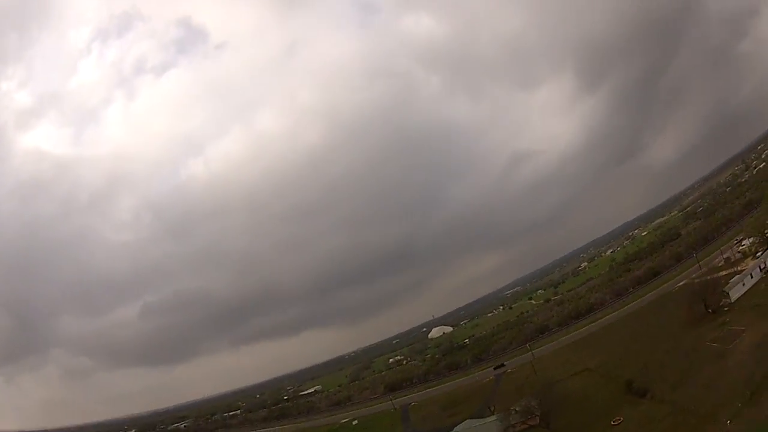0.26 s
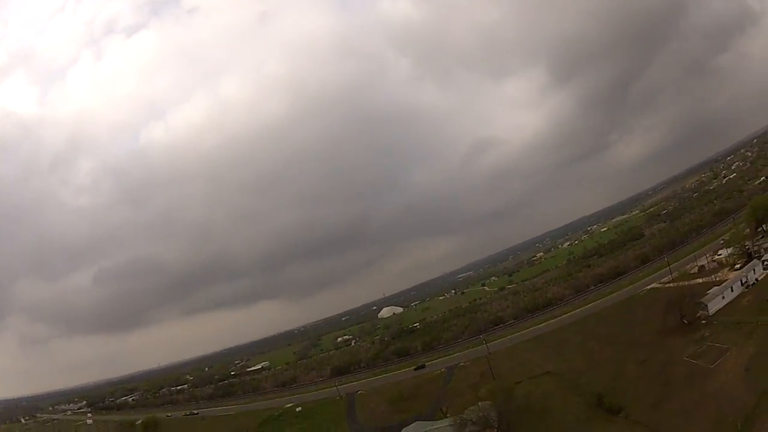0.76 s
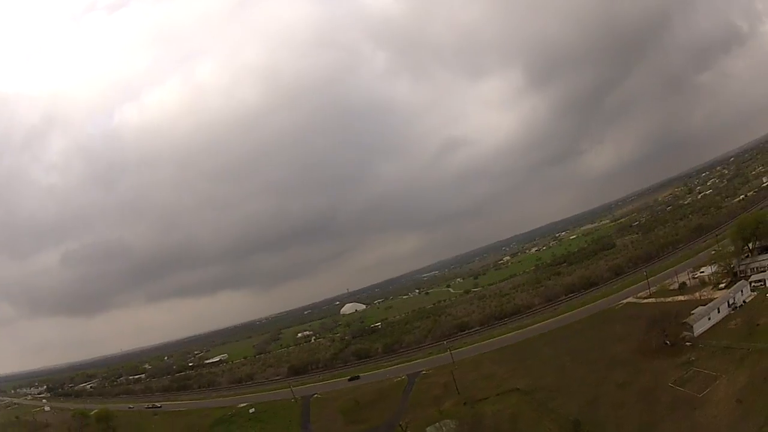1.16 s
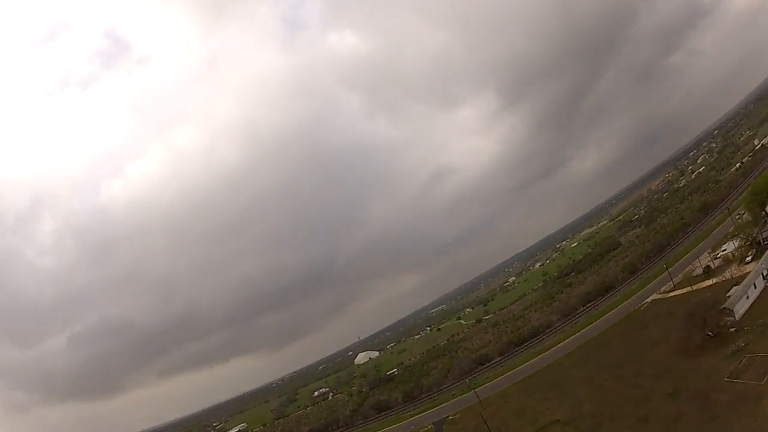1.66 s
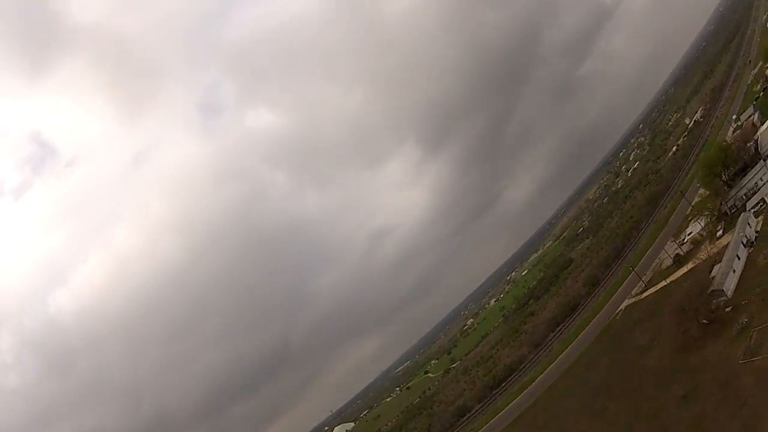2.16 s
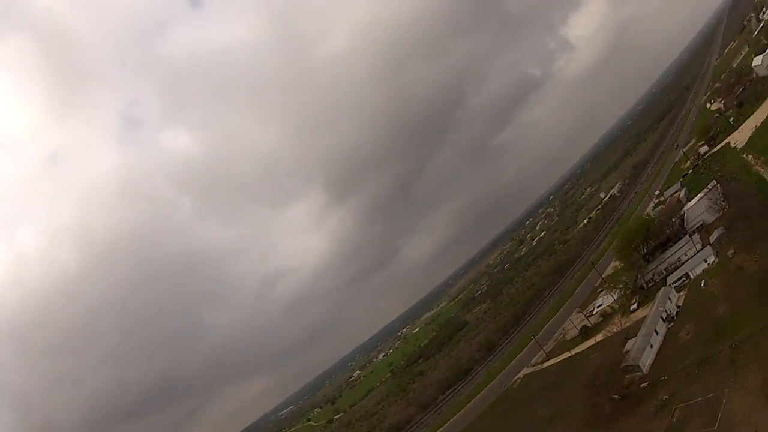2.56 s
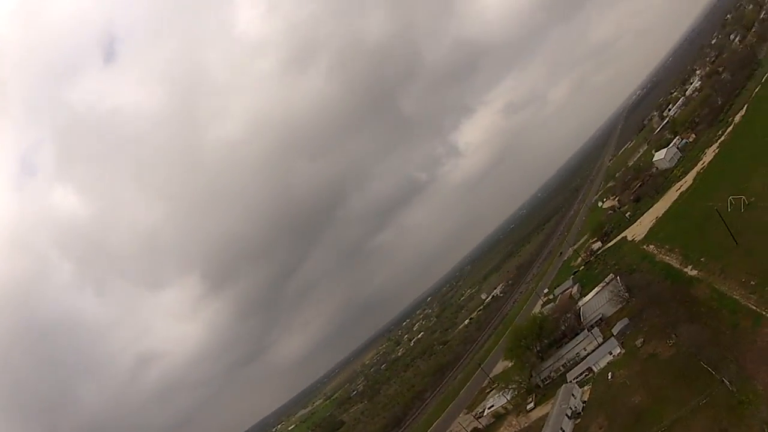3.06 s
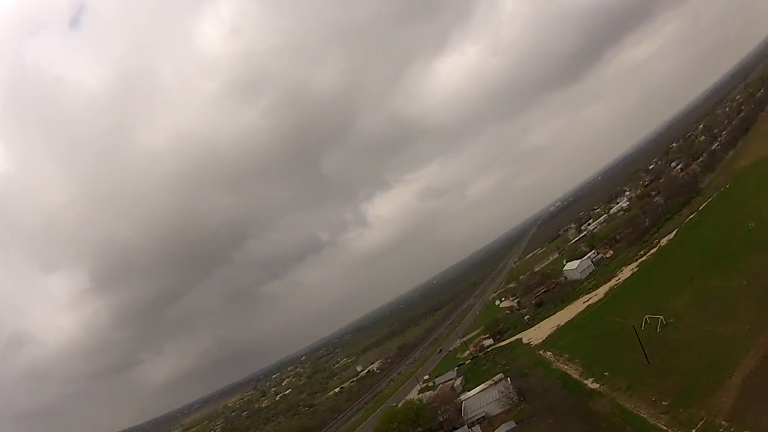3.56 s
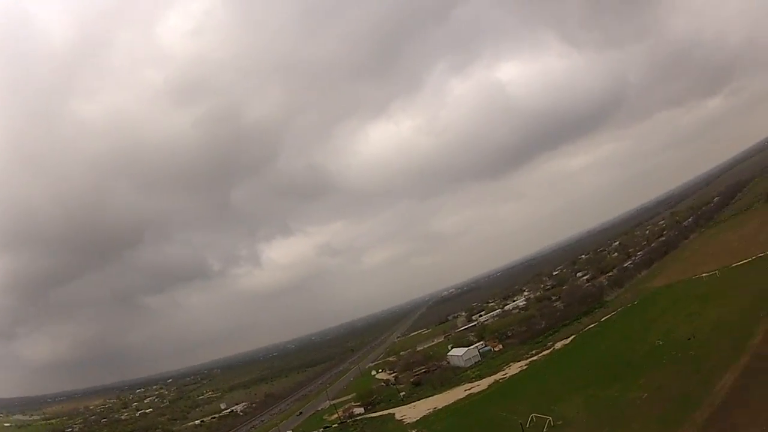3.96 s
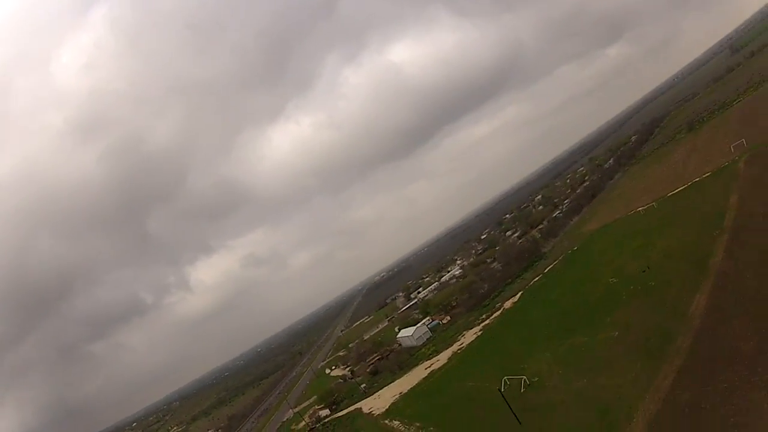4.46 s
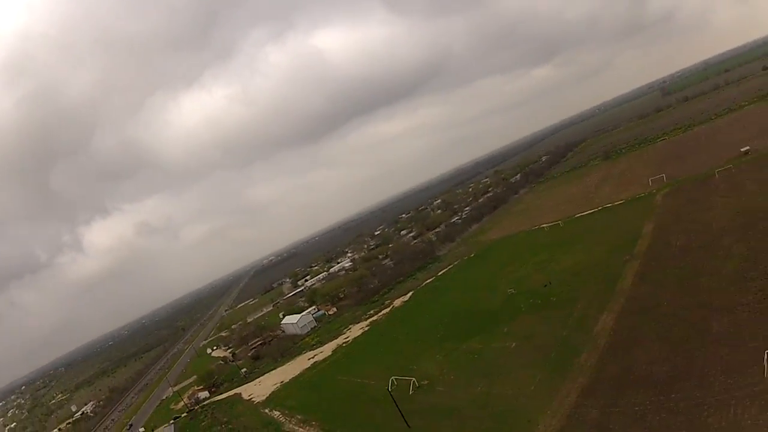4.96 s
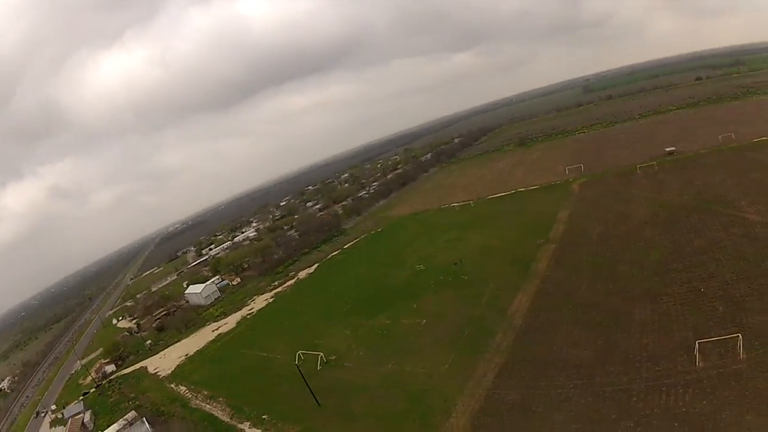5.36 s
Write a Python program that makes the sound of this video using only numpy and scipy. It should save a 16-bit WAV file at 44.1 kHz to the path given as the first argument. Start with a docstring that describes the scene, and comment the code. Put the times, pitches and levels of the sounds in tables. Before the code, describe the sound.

A small propeller buzzes steadily at full throttle, winds down quickly, then rushing wind buffets the airborne microphone and gradually weakens.

```python
"""Electric model aeroplane, on-board microphone

A two-bladed propeller buzzes at full throttle, rasping once a turn, then winds down: harmonics and noise locked to the shaft.
As its slipstream dies, wind (coloured, flickering noise) buffets the airframe, easing as speed is lost, firmer at the end.
A slow converter holds each sample, mirroring the sound into a thin treble fizz."""
import sys
import numpy as np
from scipy import signal
from scipy.fft import rfft, irfft
from scipy.io import wavfile
from scipy.ndimage import uniform_filter1d, minimum_filter1d

SR = 44100
rng = np.random.default_rng(int(sys.argv[2]) if len(sys.argv) > 2 else 0)


def int16_out(signal):
    """Quantize to a 16-bit WAV file."""
    q = np.round(np.clip(np.atleast_2d(signal).T, -1, 1) * 32767)
    wavfile.write(sys.argv[1], SR, q.astype(np.int16))


N = 247401
TIME_S = np.arange(N) / SR
BINS_HZ = np.fft.rfftfreq(N, 1 / SR)

# airframe response to blade pulses: f/Hz, level/dB
AIRFRAME_RESPONSE = [(30, -31), (160, 0.5), (220, 7.5), (330, 0.4), (500, 2.3), (660, 0.4), (790, -8),
                     (980, -20.5), (1640, -20), (1960, -16), (2600, -18.5), (3300, -22.5), (5500, -43.5)]
# rasp spectrum: f/Hz, relative density/dB
RASP_SPECTRUM = [(600, -26), (1000, -11), (1550, -26), (1950, -6), (2500, -3.5), (3350, 3), (3800, 0),
                 (4450, -5.5), (4950, 0), (5400, -11), (5900, -21.5)]
# wind spectra, low to high: f/Hz, relative density/dB
BUFFET_SPECTRUM = [(8, -5), (20, -16), (45, -4), (85, -1), (125, -2), (170, -5.5), (260, -32), (1500, -100)]
ROAR_SPECTRUM = [(70, -12), (115, -9.5), (160, -1), (245, -1), (330, -5), (390, -8.5), (470, -16),
                 (700, -69), (3000, -100)]
RUSH_SPECTRUM = [(250, -11), (350, -5.5), (420, -2), (500, -1.5), (640, -2.6), (740, -8), (860, -16.5),
                 (1000, -22.5), (1200, -22.5), (1500, -42), (5000, -100)]
HISS_SPECTRUM = [(600, -24), (1100, -5), (1450, -1.2), (2300, 0), (3050, 0.5), (3500, -7), (4100, -8),
                 (4700, -11.5), (5300, -11.5), (5900, -16.5)]
# narrow peaks in the hiss: f/Hz, width/Hz, added power re hiss/dB
HISS_PEAKS = [(1180, 59, 1.5), (2764, 94, 5), (3900, 120, -1), (4310, 89, 0)]
# brief swells and dips of the wind noise: t/s, buffet change/dB, roar change/dB, half length/s
WIND_SWELLS = [(1.36, 9, 3, 0.031), (1.532, 3, -1, 0.14), (1.953, -5, 1, 0.16), (2.25, -1.5, 0.5, 0.1),
               (2.88, 4.5, 0.5, 0.19), (3.17, 4, 1.5, 0.07), (3.564, 7.5, 3.5, 0.048),
               (3.863, 14, -3, 0.011), (4.618, 8, 2, 0.035), (5.224, 15, 6.5, 0.0088), (5.34, 1, 1.5, 0.2)]
# airflow strength: t/s, level/dB
AIRFLOW = [(0, 1), (1.65, 0.5), (2.1, -0.5), (2.6, -3.5), (3.0, -4), (3.3, -7), (3.6, -7), (4.2, -9.5),
           (4.8, -13.5), (5.1, -13), (5.6, -11)]
# wind level laws: level at 0 dB airflow/dB, slope/(dB per dB airflow), change in full slipstream/dB
BUFFET_LEVEL = (-17, 0.42, -11.5)
ROAR_LEVEL = (-9.5, 0.98, -17.5)
RUSH_LEVEL = (-16.5, 1.116, -9.5)
HISS_LEVEL = (-31, 1.0, -0.5)

FULL_BLADE_HZ = 327.0  # blade passes per second, two per turn
THROTTLE_BACK_S, SLOWING_HZ_PER_S, EASE_S = 0.864, 400, 0.018
# powered levels at full speed; exponents act on speed share
TONE_DB, TONE_EXPONENT = -16.25, 0.97
RASP_DB, RASP_EXPONENT = -22.5, 1.8
# drive cut: rasp stops, freewheeling blades are quieter
POWER_OFF_S, RELEASE_S, FREEWHEEL_DB = 1.235, 0.055, -4.5
CONVERTER_HZ, EDGE_HZ = 12000, 15290


def gain_of(db):
    """Decibels to amplitude gain."""
    return 10 ** (np.asarray(db) / 20)


def evened(x):
    """Scale to unit rms."""
    return x / np.sqrt(np.mean(x ** 2) + 1e-20)


def spectrum_db(points, hz):
    """Interpolate a dB curve on a log-frequency axis."""
    f_hz, level_db = np.transpose(points)
    return np.interp(np.log(hz + 1), np.log(f_hz + 1), level_db)


def noise(bin_gains):
    """White noise shaped by bin gains, unit rms."""
    spectrum = rfft(rng.standard_normal(N))
    return evened(irfft(spectrum * bin_gains, N))


def wander(rate_hz):
    """Slow random drift, low-passed at rate_hz, unit rms."""
    return noise(1 / (1 + (BINS_HZ / rate_hz) ** 4))


def ring(x, points, size=4096):
    """Filter through a causal minimum-phase body with the given response."""
    hz = abs(np.fft.fftfreq(size, 1 / SR))
    log_gain = np.log(gain_of(spectrum_db(points, hz)))
    # the Hilbert transform of log gain supplies the phase
    response = np.fft.ifft(np.exp(np.conj(signal.hilbert(log_gain)))).real
    return signal.oaconvolve(x, response[:size // 2])[:N]


def propeller_speed():
    """Share of full speed: steady, a rounded corner, then an even slowing to near rest."""
    slowing_s = EASE_S * np.logaddexp(0, (TIME_S - THROTTLE_BACK_S) / EASE_S)
    return np.maximum(1 - SLOWING_HZ_PER_S * slowing_s / FULL_BLADE_HZ, 1e-4)


def blades(turns, slowed, uneven_db=-15.5, blunt_db=-25, flutter_db=0.5, count=34, sharp_above=4):
    """Two pressure pulses a turn; one blade hits harder, adding odd shaft orders."""
    pulses = np.zeros(N)
    for k in range(1, count + 1):
        # slower tips make rounder pulses
        blunting_db = blunt_db * slowed * (k > sharp_above)
        order_gain = gain_of(uneven_db * (k % 2) + blunting_db)
        pulses += order_gain * np.cos(2 * np.pi * k * turns)
    return ring(pulses * gain_of(flutter_db * wander(32)), AIRFRAME_RESPONSE)


def rasp(turns, lull_at_turns=0.3, lull_width_turns=0.23, lull_db=-14, rough_db=-1.0):
    """The unbalanced shaft chafes in its mount: noise with one lull a turn."""
    from_lull_turns = (turns - lull_at_turns + 0.5) % 1 - 0.5
    lull = np.exp(-(from_lull_turns / lull_width_turns) ** 4)
    chafe = rng.standard_normal(N) * gain_of(lull_db * lull + rough_db * wander(190))
    return evened(ring(chafe, RASP_SPECTRUM))


def motor(speed, waver=0.00045):
    """Shaft angle drives blade tone and rasp; both weaken as it slows."""
    shaft_hz = FULL_BLADE_HZ / 2 * speed * (1 + waver * wander(12.7))
    turns = np.cumsum(shaft_hz) / SR
    powered = np.clip(1 - (TIME_S - POWER_OFF_S) / RELEASE_S, 0, 1)
    tone_gain = gain_of(TONE_DB + FREEWHEEL_DB * (1 - powered)) * speed ** TONE_EXPONENT
    rasp_gain = gain_of(RASP_DB) * powered ** 2 * speed ** RASP_EXPONENT
    tone = np.sqrt(2) * tone_gain * blades(turns, 1 - speed)
    return tone + rasp_gain * rasp(turns)


def wind_level(law, slipstream):
    """Level/dB of one wind part: follows airflow strength, calmer in the smooth slipstream."""
    base_db, slope, sheltered_db = law
    t_s, level_db = np.transpose(AIRFLOW)
    airflow_db = np.interp(TIME_S, t_s, level_db)
    return base_db + slope * airflow_db + sheltered_db * slipstream


def air(colour_db, level_db, flicker_db, flicker_hz):
    """Turbulence as noise of one colour; its level flickers at random."""
    return noise(gain_of(colour_db)) * gain_of(level_db + flicker_db * wander(flicker_hz))


def hissing(level_db, treble_hz=3800, extra_fade=0.29):
    """Fine hiss with narrow peaks; its treble fades fastest as the level falls."""
    peaks = np.zeros(len(BINS_HZ))
    for f_hz, width_hz, db in HISS_PEAKS:
        peaks += gain_of(db) ** 2 / (1 + (2 * (BINS_HZ - f_hz) / width_hz) ** 2)
    colour_db = spectrum_db(HISS_SPECTRUM, BINS_HZ) + 10 * np.log10(1 + peaks)
    sound = air(colour_db, level_db, flicker_db=0.5, flicker_hz=60)
    lower = irfft(rfft(sound) / (1 + (BINS_HZ / treble_hz) ** 14), N)
    treble = sound - lower
    return lower + treble * gain_of(extra_fade * (level_db - level_db.max()))


def wind(slipstream):
    """Low noise buffets and roars, higher noise rushes and hisses; buffet and roar swell and dip."""
    buffet_db = wind_level(BUFFET_LEVEL, slipstream)
    roar_db = wind_level(ROAR_LEVEL, slipstream)
    rush_db = wind_level(RUSH_LEVEL, slipstream)
    for t_s, buffet_change_db, roar_change_db, half_s in WIND_SWELLS:
        swell = np.exp(-((TIME_S - t_s) / half_s) ** 2)
        buffet_db = buffet_db + buffet_change_db * swell
        roar_db = roar_db + roar_change_db * swell
    buffet = air(spectrum_db(BUFFET_SPECTRUM, BINS_HZ), buffet_db, flicker_db=1.7, flicker_hz=22)
    roar = air(spectrum_db(ROAR_SPECTRUM, BINS_HZ), roar_db, flicker_db=-0.04, flicker_hz=25)
    rush = air(spectrum_db(RUSH_SPECTRUM, BINS_HZ), rush_db, flicker_db=1.17, flicker_hz=24.6)
    return buffet + roar + rush + hissing(wind_level(HISS_LEVEL, slipstream))


def scene():
    """Motor plus wind, same in both channels; slipstream goes as propeller speed squared."""
    speed = propeller_speed()
    mono = motor(speed) + wind(speed ** 2)
    return np.tile(mono, (2, 1))


def limit(x, size=90):
    """Smoothly lower the gain around peaks above full scale."""
    room = 1 / np.maximum(abs(x).max(0), 1)
    return x * uniform_filter1d(minimum_filter1d(room, size), size)


def hold(x, steps=4):
    """Sample at CONVERTER_HZ and hold: the steps mirror the sound into the treble."""
    guard = signal.firwin(121, 5950, window=("kaiser", 4), fs=SR)
    guarded = signal.oaconvolve(x, guard[None], "same")
    slow = signal.resample_poly(guarded, CONVERTER_HZ * steps, SR, axis=1)[:, ::steps]
    held = np.repeat(slow, steps, axis=1)
    return signal.resample_poly(held, SR, CONVERTER_HZ * steps, axis=1)[:, :N]


def record(dry):
    """Peak limiter, stepped converter, low-pass at EDGE_HZ."""
    edge = signal.firwin(1023, EDGE_HZ, window=("kaiser", 9), fs=SR)
    return signal.oaconvolve(hold(limit(dry)), edge[None], "same")


dry = scene()
out = record(dry)
int16_out(out)
```